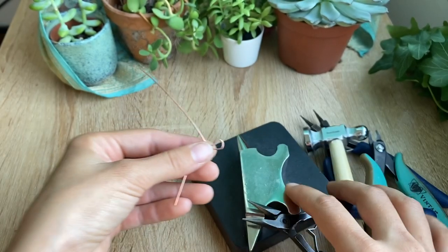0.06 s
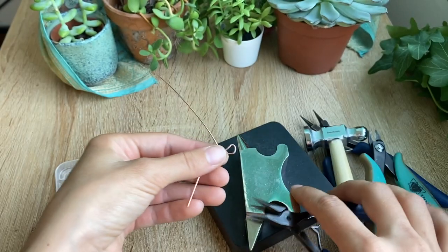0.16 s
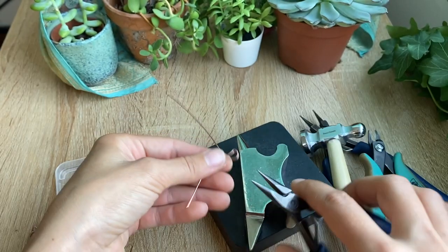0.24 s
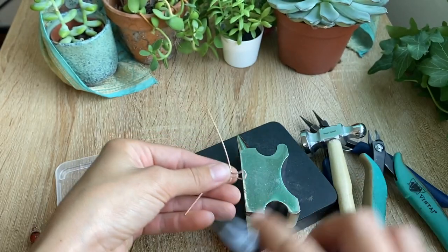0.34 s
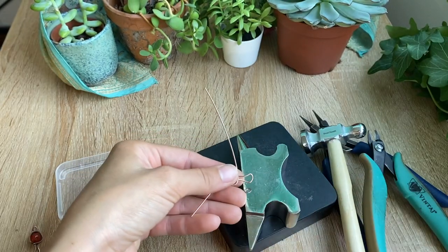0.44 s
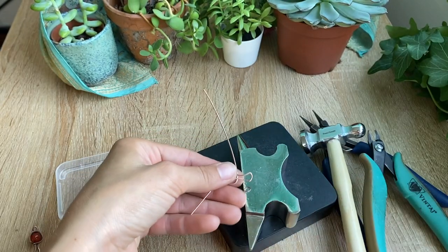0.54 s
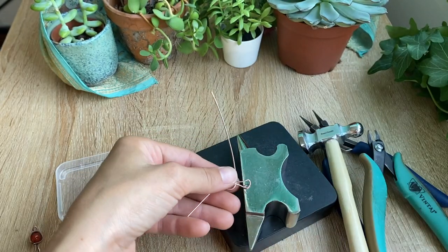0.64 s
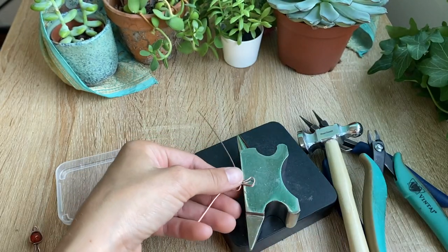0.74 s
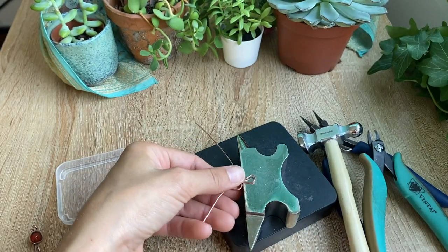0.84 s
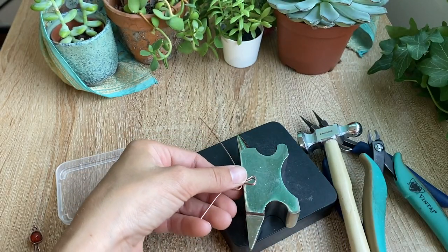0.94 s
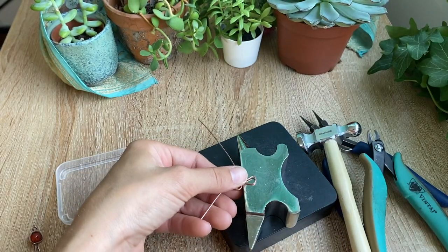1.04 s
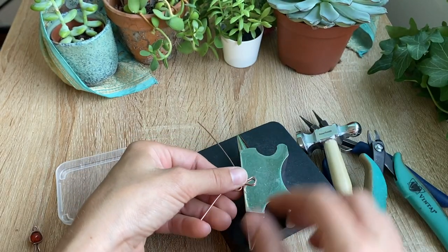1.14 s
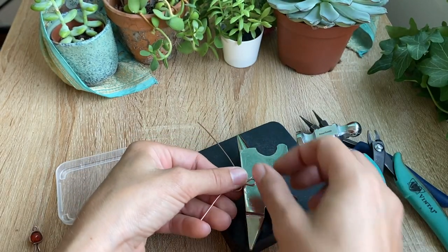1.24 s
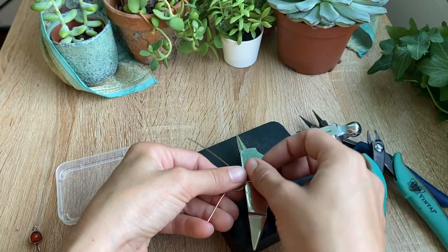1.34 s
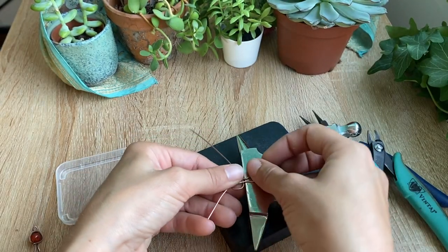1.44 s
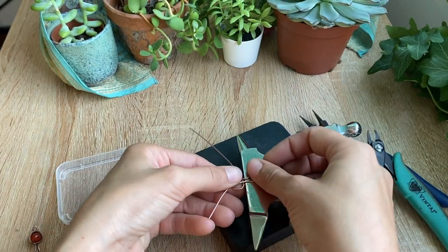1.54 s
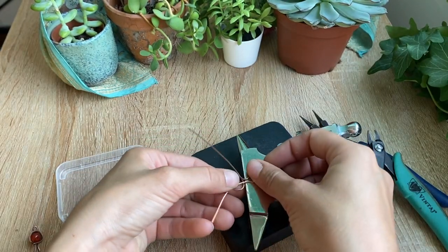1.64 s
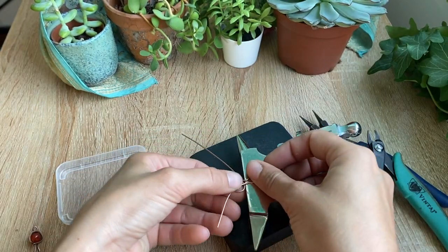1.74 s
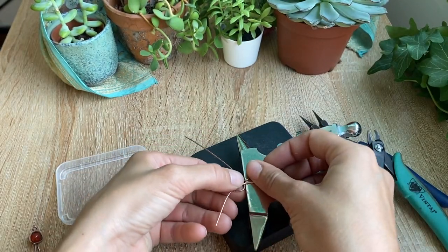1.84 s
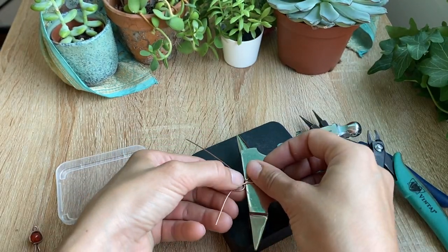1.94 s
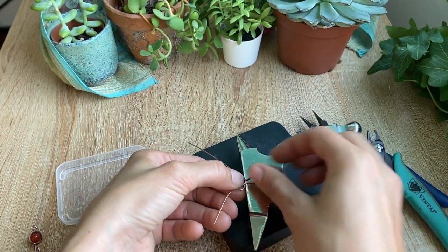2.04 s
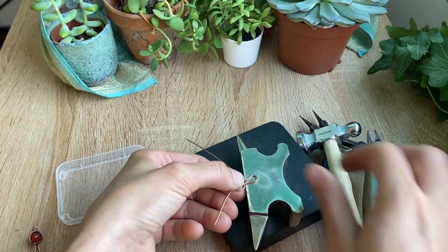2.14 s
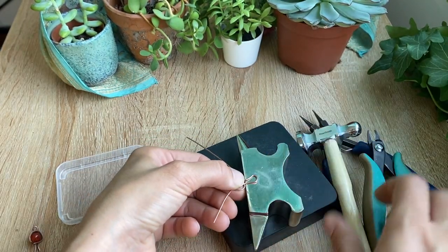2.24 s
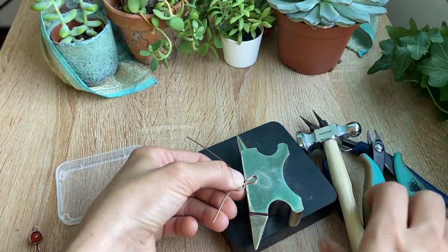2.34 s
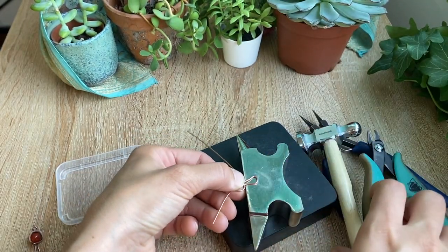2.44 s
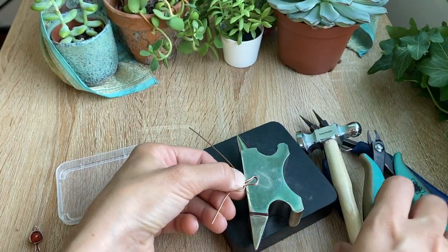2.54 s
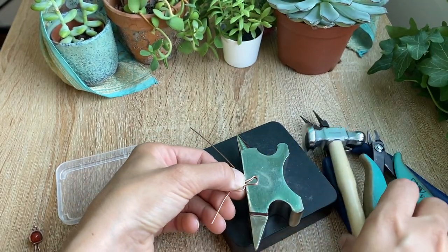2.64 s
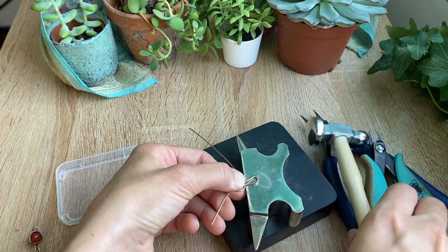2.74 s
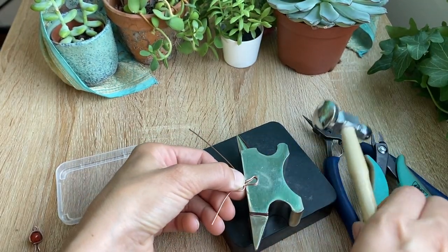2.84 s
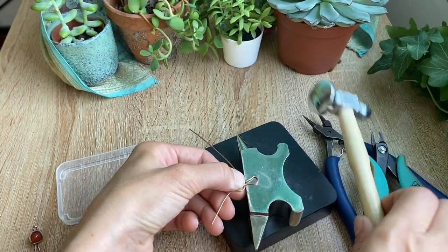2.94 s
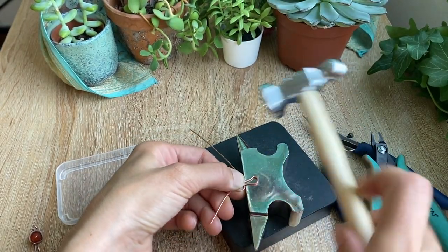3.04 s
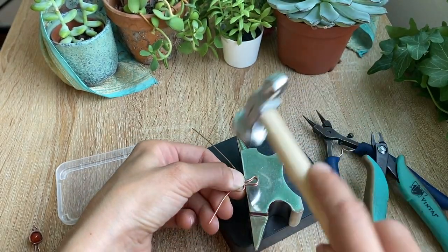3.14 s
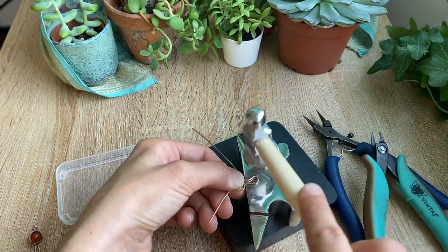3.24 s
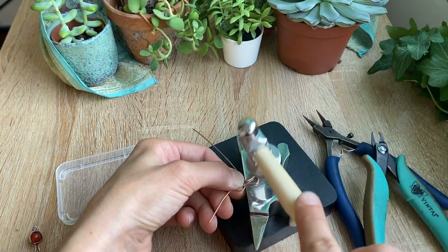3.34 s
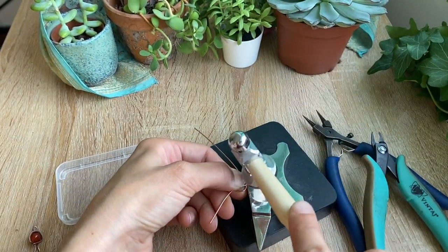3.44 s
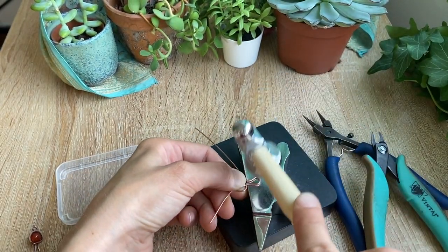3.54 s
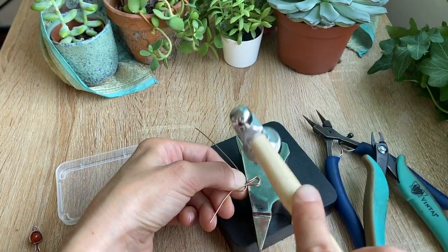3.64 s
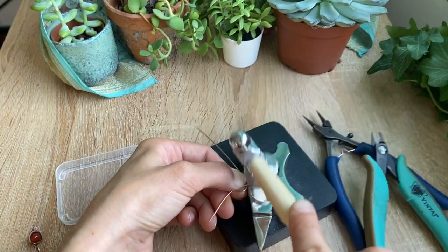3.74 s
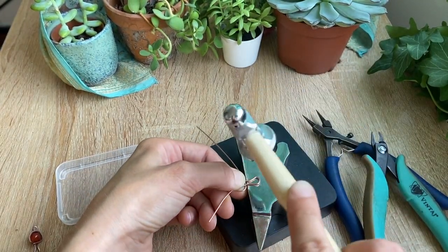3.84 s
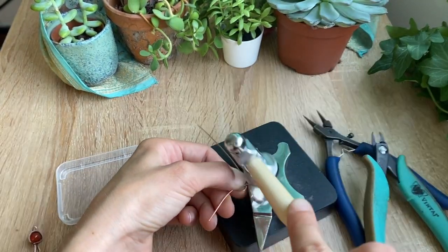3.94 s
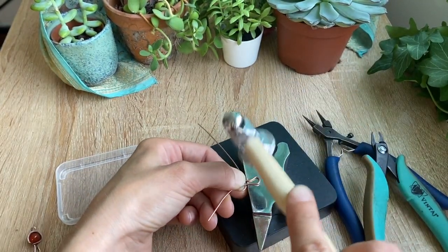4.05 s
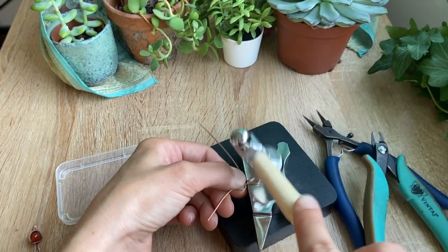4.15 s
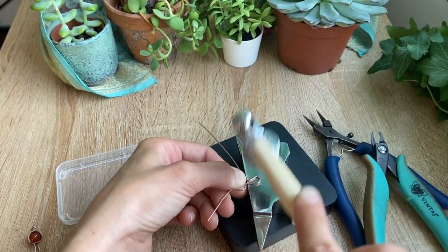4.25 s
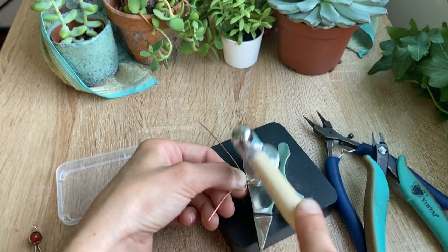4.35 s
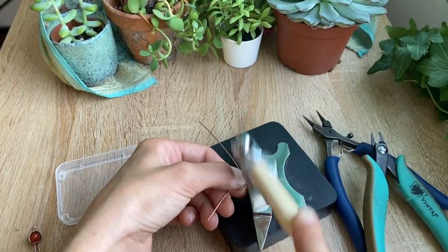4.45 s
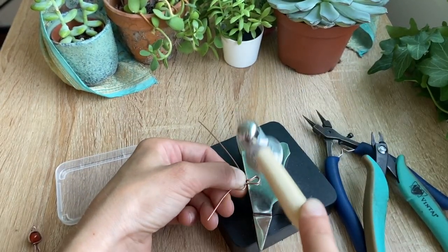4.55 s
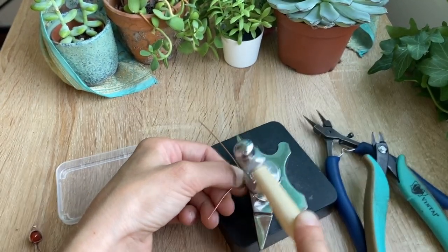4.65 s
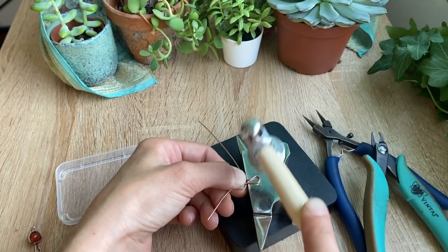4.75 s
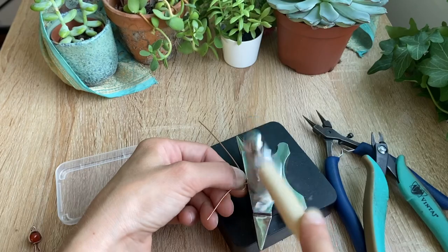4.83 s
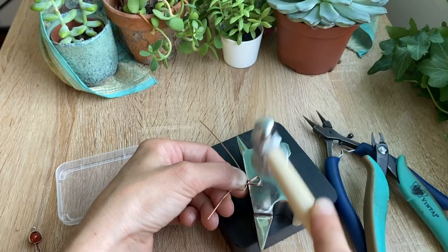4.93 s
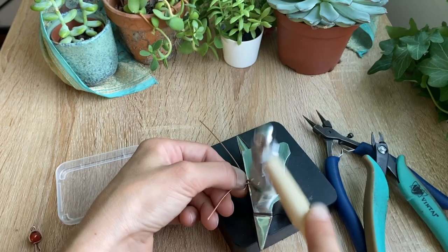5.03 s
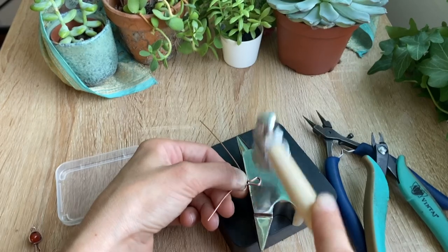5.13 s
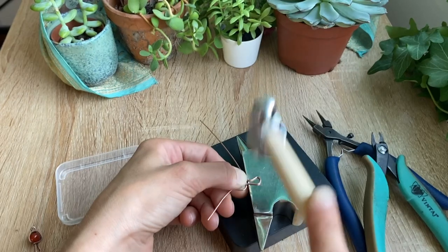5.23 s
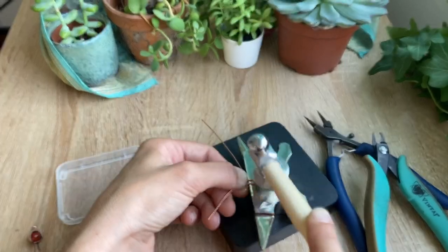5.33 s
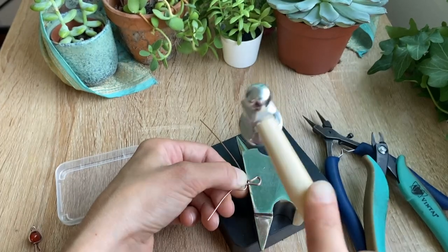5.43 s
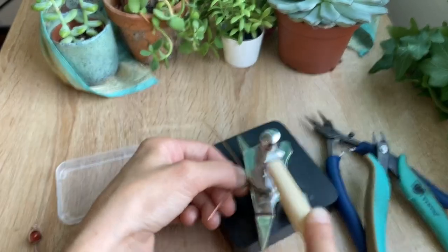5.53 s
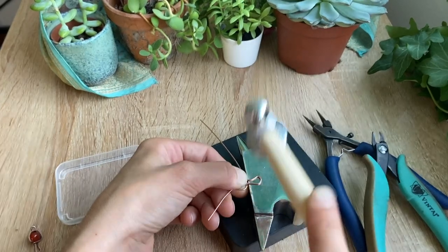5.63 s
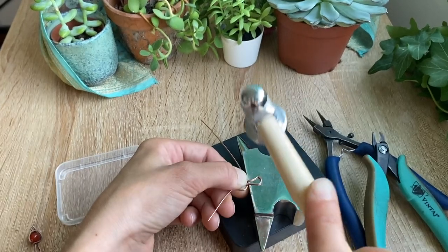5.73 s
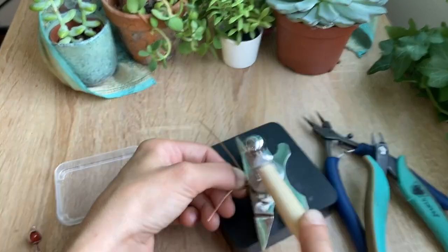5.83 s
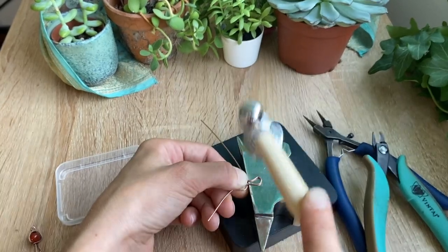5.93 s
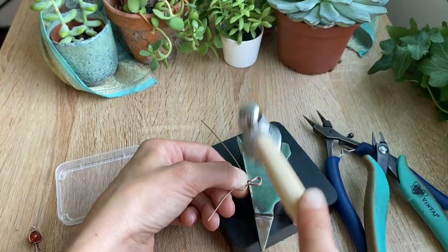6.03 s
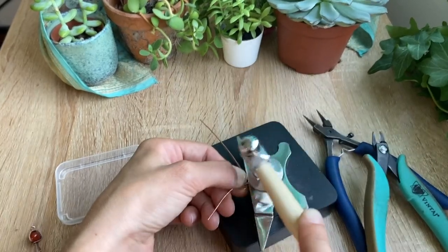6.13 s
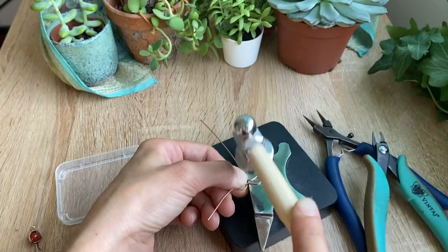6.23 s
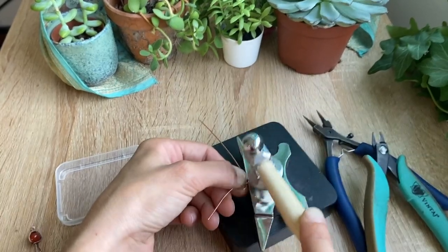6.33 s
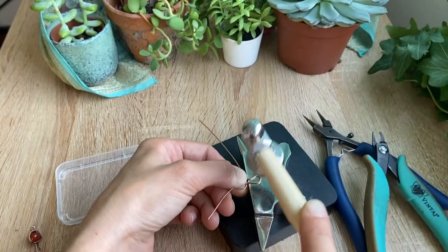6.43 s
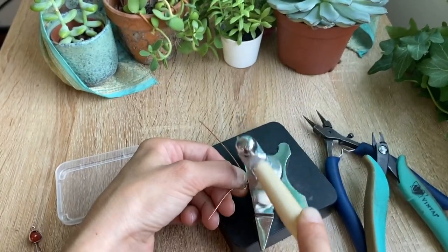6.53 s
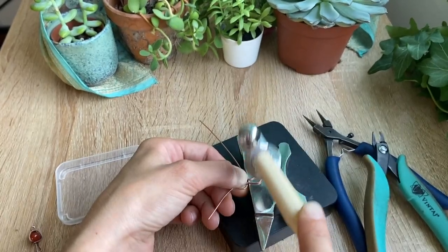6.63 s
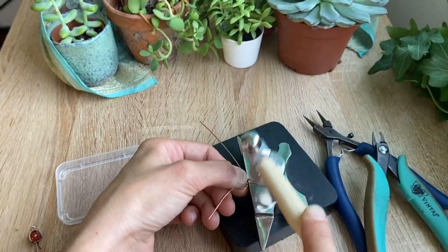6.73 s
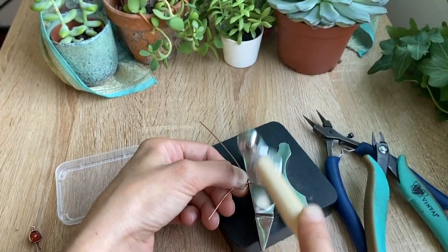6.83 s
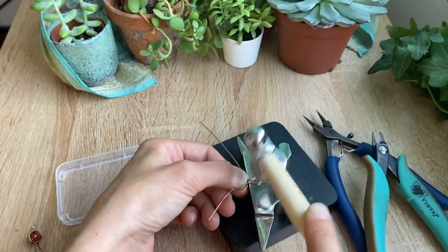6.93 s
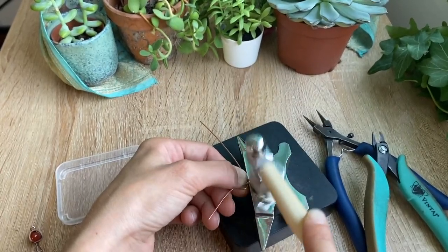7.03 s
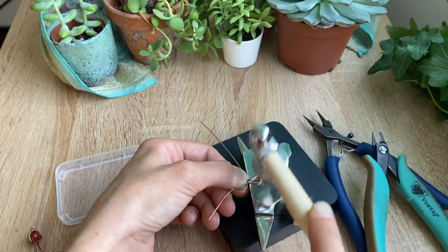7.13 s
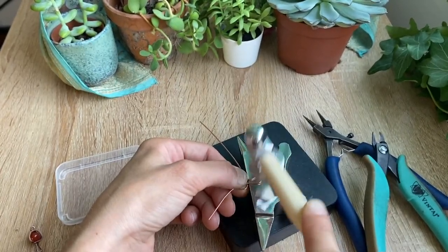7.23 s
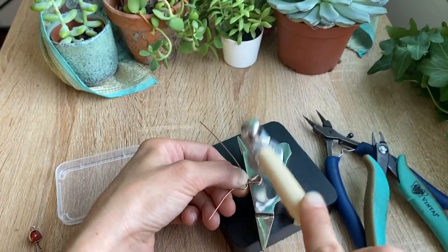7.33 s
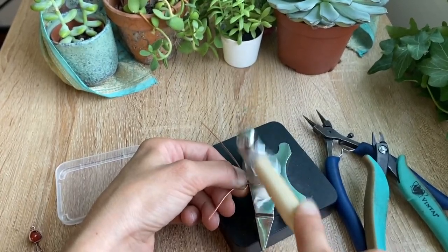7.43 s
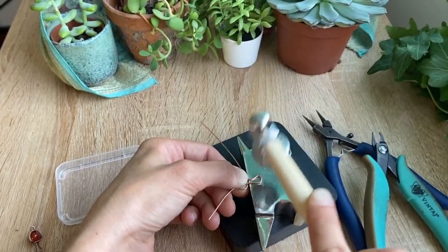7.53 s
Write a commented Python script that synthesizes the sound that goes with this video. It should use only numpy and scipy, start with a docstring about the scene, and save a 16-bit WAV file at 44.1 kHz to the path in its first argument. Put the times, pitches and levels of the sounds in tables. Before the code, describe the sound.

Close stereo sound at a wooden craft table in a small room. Pliers clatter down and a pad shifts with several hollow, fairly loud wooden bumps. A brief quiet spell follows, then a hammer is picked up with a dull thud and a small clink. After a short pause, quick even taps hit wire on a small steel anvil, each a dry tick with a hollow desk knock, some brighter.

```python
"""Hands shift on a wooden desk under a faint hiss; pliers are put down, a rubber pad is nudged, a hammer is picked up.
Nineteen fairly even blows follow, flattening copper wire on a steel anvil that stands on the pad.
Each blow is a broadband steel contact (tick), a brief ringing of the anvil's modes and a hollow knock of
desk modes, driven through the pad. Decaying noise adds the diffuse tail of a small room."""
import sys
import numpy as np
from scipy import signal
from scipy.fft import rfft, irfft
from scipy.io import wavfile

SR = 44100
rng = np.random.default_rng(int(sys.argv[2]) if len(sys.argv) > 2 else 0)


def wav_record(signal):
    """Record a signal, one row per channel, as 16-bit PCM in the file named by sys.argv[1]."""
    frames = np.transpose(np.atleast_2d(signal))
    bounded = np.clip(frames, -1, 1)
    # unit amplitude maps onto the largest positive 16-bit level
    quanta = np.round(bounded * 32767).astype(np.int16)
    wavfile.write(sys.argv[1], SR, quanta)


N = 334278  # samples

# faint hiss, which sinks just before the first blow: [t/s, level/dB]; its spectrum: [f/Hz, level/dB]
HISS = [(0, -85), (3.42, -82.5), (3.46, -100), (3.7, -100), (3.8, -83), (7.58, -84)]
HISS_COLOUR = [(350, -16), (600, -2), (1260, -12.5), (2910, -11.5), (3210, -17), (8160, -23.5), (8990, -44),
               (10900, -23), (16000, -30.5)]
# hands shifting on the desk: [t/s, level/dB]; their spectrum: [f/Hz, level/dB]
HANDLING = [(0.0, -52.5), (0.43, -51.5), (0.88, -47.5), (1.62, -61), (2.18, -65.5), (2.46, -53.5),
            (2.75, -52.5), (3.5, -78), (3.7, -95)]
HANDLING_COLOUR = [(15, -58), (25, -20), (70, -8), (107, -1.5), (141, -11.5), (216, -13), (241, -24),
                   (380, -16.5), (517, -30.5), (551, -57.5), (1200, -65), (1560, -86.5), (2640, -120)]
# spectrum of things sliding on the wood: [f/Hz, level/dB]
SLIDE_COLOUR = [(30, -30), (70, -15), (160, 2), (400, 5.5), (800, -8.5), (1200, -27.5), (3000, -38),
                (8000, -55.5), (16000, -70.5)]
# tools and pad bumping the desk: [t/s, strength level/dB, hardness/dB]
BUMPS = [(0.126, -34.5, -5.5), (0.165, -37.5, -1.5), (0.234, -16.5, -0.5), (0.517, -16, 1.5),
         (0.645, -35.5, -3.5), (0.734, -15.5, 7), (0.836, -21, -3.5), (0.999, -17, 3.5), (2.185, -53, -2.5),
         (2.284, -32.5, -21.5), (2.658, -20.5, -9), (2.83, -46, 4.5), (2.961, -49, -7)]
# steel tools touching each other: [t/s, contact level/dB, ring level/dB, the tool that rings]
CLINKS = [(0.1316, -38, -46.5, "pliers"), (0.1687, -33, -65.5, "pliers"), (0.2304, -45.5, -68, "pliers"),
          (2.6546, -44, -65, "hammer"), (2.702, -63, -76, "hammer"), (2.9342, -64.5, -77, "pliers")]
# spectra of the desk clack and the steel clink: [f/Hz, level/dB]
CLACK = [(400, 2.5), (800, 17), (1400, 3.5), (2000, -2), (3200, -15.5), (5000, -26), (8000, -44.5),
         (16000, -48.5)]
CLINK = [(590, -32.5), (1000, -1.5), (1790, -8.5), (2910, -6), (5190, -3.5), (5900, -2.5), (7270, -6.5),
         (9280, -23.5), (10400, -9), (16000, -45.5)]
# modes of the loose tools: [f/Hz, level/dB, t60/s]
PLIERS = [(2846, -2.5, 0.018), (3000, 3, 0.015), (3390, -0.5, 0.029)]
HAMMER_HEAD = [(6230, -9, .1), (6120, -5, 0.11)]
# low rumbles as the hand reaches for the hammer and grips it: [t/s, peak level/dB]; spectrum: [f/Hz, level/dB]
REACH = [(2.444, -25.5), (2.61, -44.5)]
REACH_COLOUR = [(12, -36), (20, -3), (70, 0.5), (109, 1.5), (173, -19), (198, -17.5), (236, -23),
                (400, -43.5), (520, -64), (880, -120)]
# hammer blows: [t/s, strength level/dB, hardness/dB]
# hardness is high where the face lands square, low where the wire cushions it
BLOWS = [(3.731, -32, -3), (3.928, -29.5, 0), (4.108, -28.5, 0), (4.296, -28, -0.5), (4.472, -28.5, 0),
         (4.649, -30, .5), (4.836, -28.5, 1.5), (5.036, -29.5, 3.5), (5.262, -28, 5), (5.516, -29.5, 5.5),
         (5.809, -28.5, 3), (6.074, -29, 1), (6.283, -32, -1.5), (6.477, -31, 1), (6.664, -30.5, 1),
         (6.853, -32, 2), (7.035, -33, -3), (7.249, -33, -7.5), (7.438, -29.5, -3.5)]
# spectra of the tick and of the bright snap of a square blow: [f/Hz, level/dB]
TICK = [(500, 12), (1300, 8), (1900, 4.5), (2700, -3.5), (4100, -4.5), (5200, -13), (6600, -18),
        (7800, -24), (10500, -42.5), (16500, -37.5)]
SNAP = [(3500, -15), (5200, -7.5), (6300, 3), (7000, 0), (7800, -27), (9000, -33.5), (10500, -31.5),
        (11800, -4), (13000, -23.5), (15000, -6), (16500, -24)]
# modes of the anvil: [f/Hz, level/dB, t60/s]
STEEL = [(11630, -1, 0.027), (12500, -19, .05), (13800, -16, .012), (14780, -17, .2), (15100, -4.5, 0.078)]
# modes of the desk top with pad and anvil, before the hand's loss:
# [f/Hz, t60/s, level struck through the anvil/dB, level bumped directly/dB, left-right difference/dB]
DESK = [(47, 0.35, -38, -48.5, -4), (68.8, 0.57, -22.5, -28, 1.5), (95.2, 0.49, -19, -30, -1),
        (116.8, 0.98, -24.5, -21.5, 0.5), (164.1, 0.2, -14.5, -9, -6.5), (201.1, 0.26, -11.5, -11.5, 2.5),
        (272.2, 0.1, 2.5, -8, -3), (284.1, 0.15, -40, -4.5, 2), (374.7, 0.13, 3, 0.5, 2),
        (417.5, 0.089, -0.5, -9, 8), (489.8, 0.11, -14.5, -8.5, 6), (566, 0.091, -4, -15.5, -10.5),
        (687.5, 0.078, -17.5, -9, 4.5), (727, 0.21, -9.5, -20, 7), (765.4, 0.032, -8.5, -23, 2.5),
        (904.5, 0.21, -13.5, -32.5, 0.5), (992, 0.03, -17.5, -29, 1), (1229, 0.015, 4, -30.5, -5),
        (1333, 0.11, -23.5, -40, 2.5), (1712, 0.033, -10, -33, -3.5), (2240, 0.04, -20.5, -40, 7.5)]
# borders between the desk's boom, knock and rap: [f/Hz]
REGISTERS_HZ = [180, 560]
# loss that the hand resting on the work adds to boom, knock and rap: [t60 of that loss alone/s]
HAND_LOSS_T60 = [3, 0.97, 0.18]
# room tail: spectrum [f/Hz, level/dB] and decay [f/Hz, t60/s]
ROOM_COLOUR = [(100, -35), (280, -6.5), (400, -12), (700, -6), (1300, 4), (1650, -8), (2400, 2), (4200, -1),
               (5200, -0.5), (6700, -2.5), (10000, -6.5), (16000, -10.5)]
ROOM_T60 = [(100, 1), (400, .36), (1500, 0.36), (4000, 0.41), (7000, 0.25), (15000, .18)]

# sliding before and after each bump: level against the bump (dB), rise and fall (dB per s)
SLIDE_DB, SLIDE_RISE_DB_PER_S, SLIDE_FALL_DB_PER_S = -23.5, 699.5, 219.5
# boom of a bump of strength 0 (dB), and the dB that it gains per dB of strength
BUMP_BOOM_DB, BUMP_BOOM_GROWTH = -3.5, 0.82
# a bump's rap and clack (dB against strength plus hardness)
BUMP_RAP_DB, CLACK_DB = 1, -3.5
REACH_RISE_DB_PER_S, REACH_FALL_DB_PER_S = 283, 333
# desk boom against the blow's strength (dB): slight in the opening taps, full once the swings get wider (s)
TAP_BOOM_DB, SWING_BOOM_DB, SWINGS_FROM_S = 0, 8.5, 4.95
# the desk's knock and rap against the blow's strength (dB)
KNOCK_DB, RAP_DB = 1.88, 2.34
# the wire loop gives way just before the hit: lead (s), level against the tick (dB)
PRESS_S, PRESS_DB = 0.005, -14.5
# the steel sounds of a blow of hardness 0 (dB), and the dB that each gains per dB of hardness
TICK_DB, TICK_GROWTH = -24.5, 1
SNAP_DB, SNAP_GROWTH = -35, 1.9
RING_DB, RING_GROWTH, RING_LIMIT_DB = -59, 5, -55.5
ROOM_DB = -10.5  # tail against the direct sound
CUTOFF_HZ = 16300


def from_db(db):
    """An amplitude ratio is ten to the power of its level over 20 dB."""
    return 10 ** (np.asarray(db) / 20)


def unit_energy(x):
    """Normalisation: the squared samples of each channel sum to one."""
    return x / np.sqrt(np.sum(x ** 2, axis=-1, keepdims=True) + 1e-30)


def at_hz(points, hz):
    """Linear interpolation of a table on a logarithmic frequency axis."""
    known_hz, values = np.transpose(points)
    return np.interp(np.log(np.maximum(hz, 1)), np.log(known_hz), values)


def seconds(length):
    """Uniform sampling: the time axis (s) of a sound of this length (s)."""
    return np.arange(int(length * SR)) / SR


def pan(db):
    """Interaural level difference: half is added at the left, half is taken at the right."""
    return from_db(np.array([[db], [-db]]) / 2)


def add(out, s, sound):
    """Linear superposition: mixes a stereo sound in at time s."""
    start = int(round(s * SR))
    out[:, start:start + sound.shape[1]] += sound[:, :N - start]


def through(x, response):
    """A linear system's output is the convolution of its input with its impulse response."""
    return signal.oaconvolve(np.atleast_2d(x), np.atleast_2d(response), axes=1)[:, :N]


def level(rows, fade_s=0.051):
    """Envelope: gain interpolated in dB between rows, with a Gaussian fade to silence outside them."""
    s, db = np.transpose(rows)
    t = np.arange(N) / SR
    outside = np.maximum(0, np.maximum(s[0] - t, t - s[-1]))
    return from_db(np.interp(t, s, db)) * np.exp(-(outside / fade_s) ** 2)


def swells(times, peak_db, rise_db_per_s, fall_db_per_s):
    """Exponential growth and decay: a gain that rises to each peak and dies away after it."""
    t = np.arange(N) / SR
    each = []
    for s, db in zip(times, peak_db):
        drop_db = np.maximum((s - t) * rise_db_per_s, (t - s) * fall_db_per_s)
        each.append(db - drop_db)
    return from_db(np.max(each, axis=0).clip(min=-200))


def noise(colour, side_db):
    """Spectral shaping of white noise: a mid of rms 1, and a side that enters the ears in antiphase."""
    hz = np.arange(N // 2 + 1) * SR / N
    spectrum = rfft(rng.standard_normal((2, N))) * from_db(at_hz(colour, hz))
    mid, side = unit_energy(irfft(spectrum, N)) * np.sqrt(N)
    return mid + from_db(side_db) * side * [[1], [-1]]


def hiss():
    """Stationary random noise under a slow envelope."""
    return level(HISS) * noise(HISS_COLOUR, side_db=-2)


def shifting_hands():
    """Random friction: low noise follows the hands' movement on the desk."""
    return level(HANDLING) * noise(HANDLING_COLOUR, side_db=-10.5)


def sliding():
    """Sliding friction: noise swells quickly before each bump and dies more slowly after it."""
    s, strength_db, _ = np.transpose(BUMPS)
    gain = swells(s, strength_db + SLIDE_DB, SLIDE_RISE_DB_PER_S, SLIDE_FALL_DB_PER_S)
    return gain * noise(SLIDE_COLOUR, side_db=-4)


def desk(times, register_db, mode_db, swell_cycles, left_lag_s, spot_db, detune, stiffening, settle_s):
    """Modal superposition: damped modes swell over about a cycle with alternating signs, so the lows come late."""
    hz, t60, _, _, pan_db = np.transpose(DESK)
    register = np.searchsorted(REGISTERS_HZ, hz)
    # loss rates add
    t60 = 1 / (1 / t60 + 1 / np.array(HAND_LOSS_T60)[register])
    t = np.maximum(seconds(0.7) - [[left_lag_s], [0]], 0)
    rings = []
    for k, f in enumerate(hz):
        envelope = from_db(-60 * t / t60[k]) * (1 - np.exp(-t * f / swell_cycles))
        rings.append((-1) ** k * pan(pan_db[k]) * envelope * np.sin(2 * np.pi * f * t))
    rings = np.array(rings)
    steps = np.arange(t.shape[1])
    # the squeezed rubber is stiffer, so each knock starts sharp and sinks in pitch
    glide = np.cumsum(1 + stiffening * np.exp(-t[1] / settle_s))
    out = np.zeros((2, N))
    for s, strength_db in zip(times, np.transpose(register_db)):
        # the spot that is hit shifts the balance of the modes, the hand's pressure their pitch
        db = mode_db + strength_db[register] + spot_db * rng.standard_normal(len(hz))
        pitch = 1 + detune * rng.standard_normal()
        both_ears = np.tensordot(from_db(db), rings, 1)
        knock = np.array([np.interp(glide * pitch, steps, ear, right=0) for ear in both_ears])
        add(out, s, knock)
    return out


def minimum_phase_pulse(colour, size=2048):
    """Minimum phase: folding the cepstrum gives the sharpest causal pulse with this spectrum."""
    hz = np.arange(size // 2 + 1) * SR / size
    cepstrum = irfft(np.log(from_db(at_hz(colour, hz))))
    cepstrum[1:size // 2] *= 2
    cepstrum[size // 2 + 1:] = 0
    return unit_energy(irfft(np.exp(rfft(cepstrum))))


def contacts(times, db, colour, grit_db, grit_t60, scatter_db, scatter_t60):
    """Impact and scattering: a click, grit as metal slides, then echoes off pots, tools and moving hands."""
    t = seconds(0.12)
    out = np.zeros((2, N))
    for s, gain in zip(times, from_db(db)):
        grit = unit_energy(rng.standard_normal(len(t)) * from_db(-60 * t / grit_t60))
        # scatter differs at each ear
        scatter = unit_energy(rng.standard_normal((2, len(t))) * from_db(-60 * t / scatter_t60))
        add(out, s, gain * ((t == 0) + from_db(grit_db) * grit + from_db(scatter_db) * scatter))
    return through(out, minimum_phase_pulse(colour))


def bumps():
    """Direct excitation of the desk's modes, with a clack that grows with strength and hardness."""
    s, strength_db, hardness_db = np.transpose(BUMPS)
    boom_db = BUMP_BOOM_DB + BUMP_BOOM_GROWTH * strength_db
    rap_db = strength_db + hardness_db
    body = desk(s, [boom_db, strength_db, rap_db + BUMP_RAP_DB], np.array(DESK)[:, 3], swell_cycles=1.0,
                left_lag_s=0.00015, spot_db=3.5, detune=0.027, stiffening=0.083, settle_s=0.012)
    clack = contacts(s, rap_db + CLACK_DB, CLACK, grit_db=-2, grit_t60=0.035, scatter_db=6.5, scatter_t60=0.14)
    return body + clack


def strikes(times, db):
    """Impulsive excitation: one single-sample click for each contact."""
    clicks = np.zeros(N)
    samples = np.clip(np.round(times * SR).astype(int), 0, N - 1)
    clicks[samples] = from_db(db)
    return clicks


def body_ring(modes):
    """Free vibration: a small steel part's impulse response is a sum of damped sines."""
    t = seconds(0.4)
    return sum(from_db(db - 60 * t / t60) * np.sin(2 * np.pi * hz * t) for hz, db, t60 in modes)


def clinks():
    """Steel on steel: a short contact noise excites the free modes of pliers or hammer head."""
    s, clink_db, ring_db, tool = map(np.array, zip(*CLINKS))
    clink = contacts(s, clink_db, CLINK, grit_db=3.0, grit_t60=0.008, scatter_db=6.5, scatter_t60=0.036)
    ring = 0
    for name, modes in [("pliers", PLIERS), ("hammer", HAMMER_HEAD)]:
        mine = tool == name
        ring = ring + through(strikes(s[mine], ring_db[mine]), body_ring(modes))
    return clink + ring


def arranging():
    """Superposition of desk bumps and steel clinks, slightly left of centre."""
    return (bumps() + clinks()) * pan(1.2)


def room_tail():
    """Diffuse reverberation: noise that decays exponentially at its own pace in each band."""
    t, tail = seconds(0.6), 0
    edges = np.geomspace(80, 18000, 15)
    white = rng.standard_normal((2, 2, len(t)))
    for k, (low, high) in enumerate(zip(edges, edges[1:])):
        hz = np.sqrt(low * high)
        sos = signal.butter(2, [low, high], "band", fs=SR, output="sos")
        # neighbouring bands use different noise
        band = signal.sosfilt(sos, white[k % 2])
        tail = tail + band * from_db(at_hz(ROOM_COLOUR, hz) - 60 * t / at_hz(ROOM_T60, hz))
    build_up_s = 0.0022
    return unit_energy(tail * (1 - np.exp(-t / build_up_s)))


def room(x):
    """Time-variant reverberation: the swinging arm changes the echo paths, so each fifth of a second has its own tail."""
    hop = SR // 5
    out = np.zeros((2, N))
    crossfade = np.sin(np.pi * np.arange(2 * hop) / (2 * hop))
    for start in range(0, N - hop, hop):
        piece = x[:, start:start + 2 * hop]
        faded = piece * crossfade[:piece.shape[1]]
        add(out, start / SR, signal.fftconvolve(faded, room_tail(), axes=1))
    return out


def reaching():
    """Low random noise swells and decays as the hand reaches for the hammer and grips it."""
    s, peak_db = np.transpose(REACH)
    return swells(s, peak_db, REACH_RISE_DB_PER_S, REACH_FALL_DB_PER_S) * noise(REACH_COLOUR, side_db=-13.5)


def hammering():
    """Impact and transmission: steel meets wire and anvil; the push passes through the rubber pad into the desk."""
    s, strength_db, hardness_db = np.transpose(BLOWS)
    boom_db = strength_db + np.where(s < SWINGS_FROM_S, TAP_BOOM_DB, SWING_BOOM_DB)
    body = desk(s, [boom_db, strength_db + KNOCK_DB, strength_db + RAP_DB], np.array(DESK)[:, 2],
                swell_cycles=0.71, left_lag_s=0.00023, spot_db=2.0, detune=0.028, stiffening=0.075, settle_s=0.016)
    # the head first presses the springy loop flat, then bottoms out on the anvil
    tick_db = TICK_DB + TICK_GROWTH * hardness_db
    press = contacts(s - PRESS_S, tick_db + PRESS_DB, TICK, grit_db=11.0, grit_t60=0.16,
                     scatter_db=13.0, scatter_t60=0.025)
    tick = contacts(s, tick_db, TICK, grit_db=7.5, grit_t60=0.0065, scatter_db=8.5, scatter_t60=0.058)
    # square blows add a hard, bright snap and set the anvil ringing
    bright = contacts(s, SNAP_DB + SNAP_GROWTH * hardness_db, SNAP, grit_db=-13.5, grit_t60=0.0043,
                      scatter_db=-3.5, scatter_t60=0.012)
    ring_db = np.minimum(RING_DB + RING_GROWTH * hardness_db, RING_LIMIT_DB)
    ring = through(strikes(s, ring_db), body_ring(STEEL))
    return body + (press + tick + bright) * pan(-0.53) + ring


def scene():
    """Superposition: bumps and blows with their reverberation, over quiet handling noise and hiss."""
    hits = arranging() + hammering()
    handling = shifting_hands() + sliding() + reaching()
    return hits + from_db(ROOM_DB) * room(hits) + handling + hiss()


def record(dry):
    """Band limitation: the microphone loses the deepest bass; the top is cut steeply."""
    bass_cut = signal.butter(2, 24, "high", fs=SR, output="sos")
    top_cut = signal.ellip(10, 0.1, 80, CUTOFF_HZ, fs=SR, output="sos")
    return signal.sosfilt(top_cut, signal.sosfilt(bass_cut, dry))


dry = scene()
out = record(dry)
wav_record(out)
```